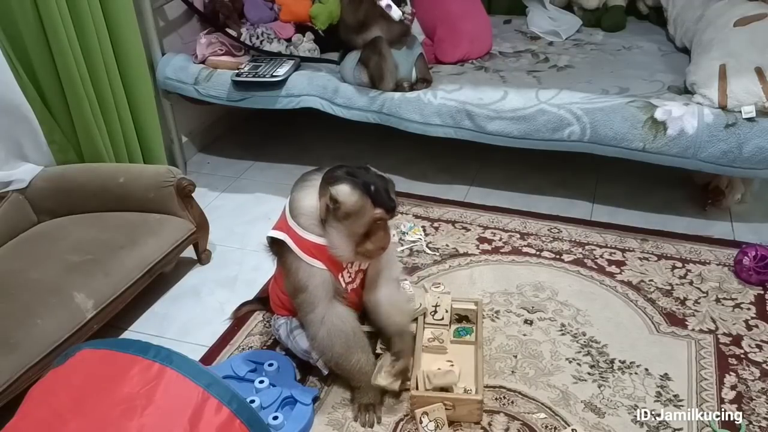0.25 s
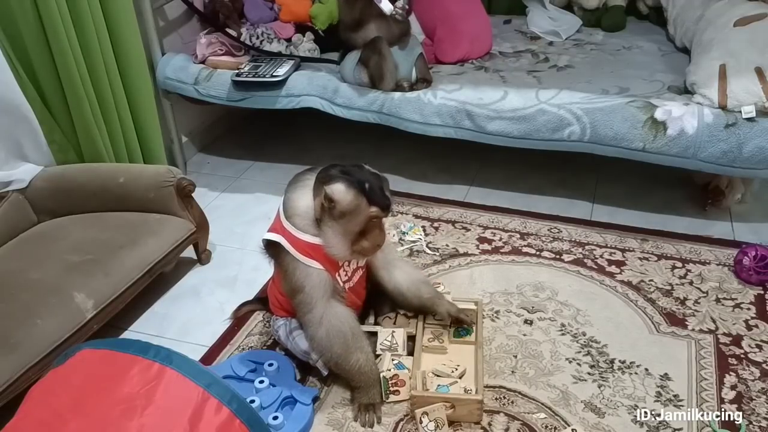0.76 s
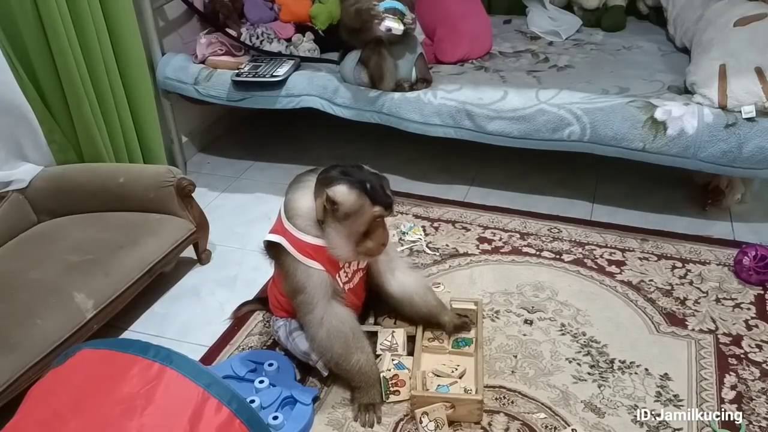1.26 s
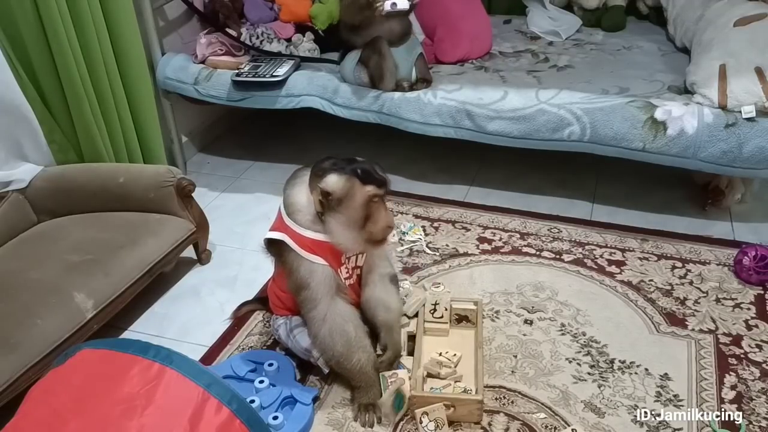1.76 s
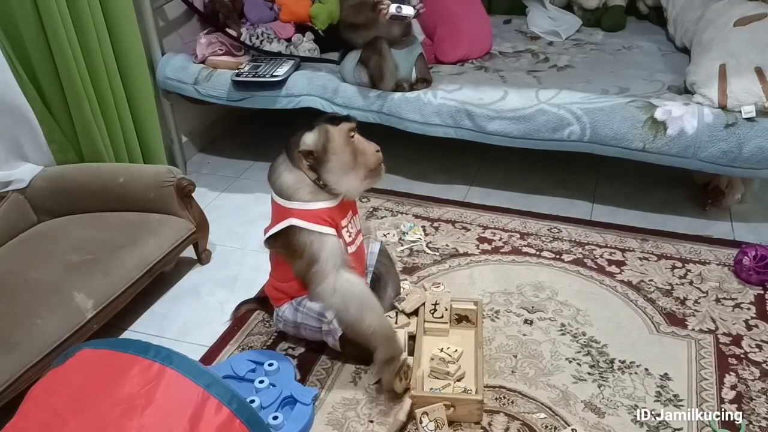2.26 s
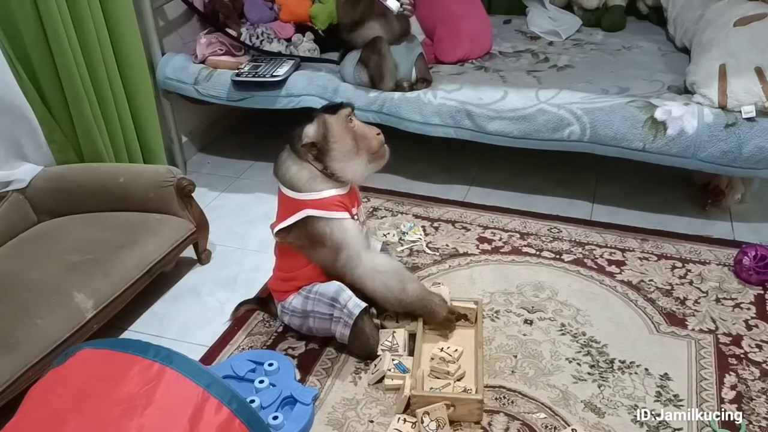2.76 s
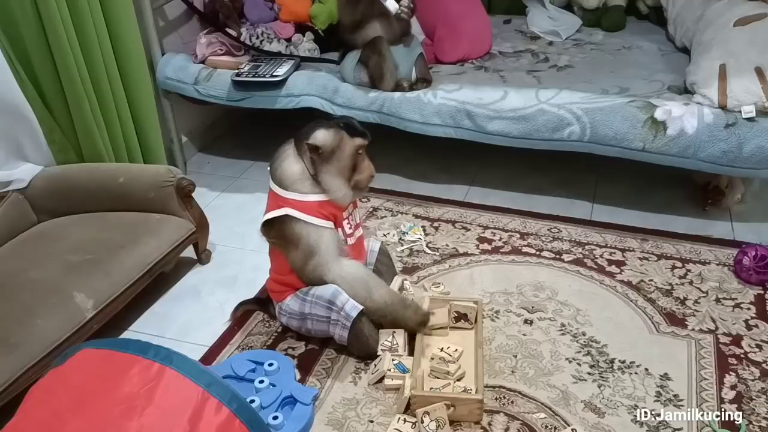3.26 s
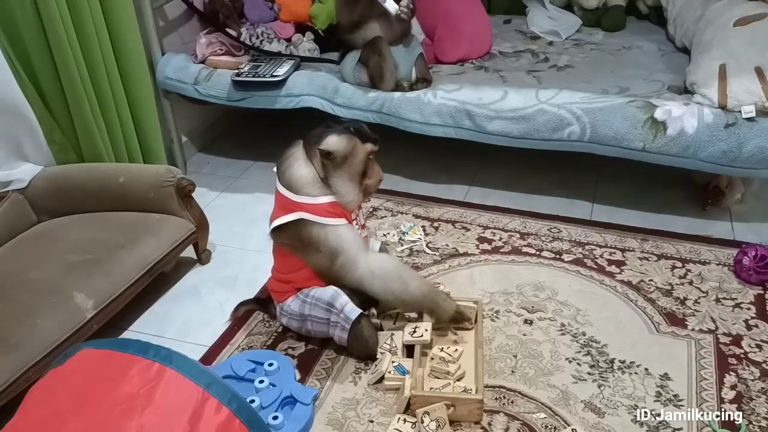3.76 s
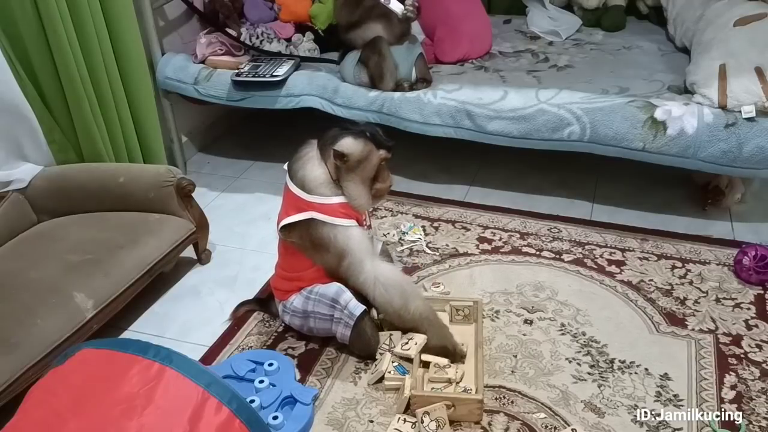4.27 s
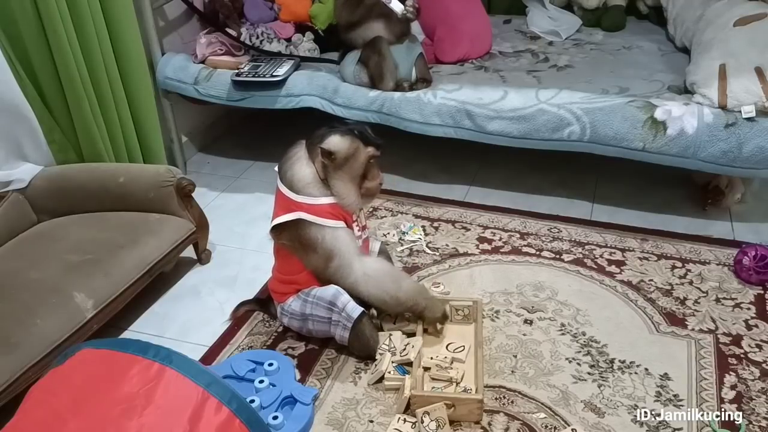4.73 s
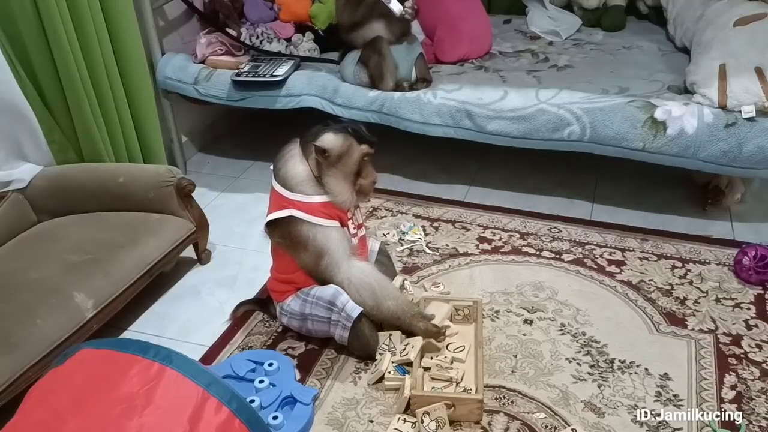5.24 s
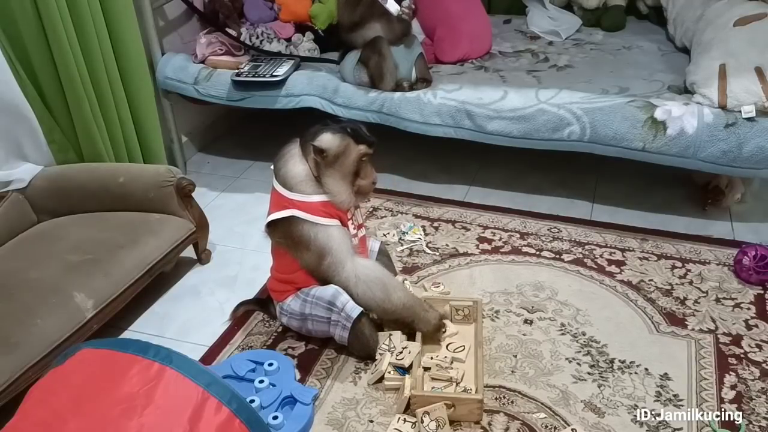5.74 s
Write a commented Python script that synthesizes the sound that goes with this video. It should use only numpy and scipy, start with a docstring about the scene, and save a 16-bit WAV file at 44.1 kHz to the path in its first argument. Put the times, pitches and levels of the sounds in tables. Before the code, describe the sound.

Wooden blocks are rummaged in a shallow box on carpet, a couple of metres from a phone microphone. A dense clatter with scraping opens, soft cloth swishes pass close on the left, then another sharp burst of clacks. Quiet isolated taps follow, before firmer knocks return past the middle and a hard cluster lands near the end. The small tiled room adds brief echoes over soft air noise and a faint low hum.

```python
"""Rummaging in a box of wooden blocks

A monkey rummages through puzzle blocks in a shallow wooden box on a carpet, a couple of metres from the microphone.
Each contact thuds the box, clacks and rings a block and ticks at its edge; filtered jerks of noise scrape in between.
Hissing cloth swishes close by on the left; echoes and a noise tail make a small tiled room, over a faint sine hum."""
import sys
import numpy as np
from scipy import signal
from scipy.fft import rfft, irfft
from scipy.io import wavfile

SR = 44100
rng = np.random.default_rng(int(sys.argv[2]) if len(sys.argv) > 2 else 0)


def store_wav(level_fs):
    """Save 16-bit WAV to argv[1]."""
    pcm = np.round(np.clip(np.atleast_2d(level_fs), -1, 1) * 32767)
    wavfile.write(sys.argv[1], SR, pcm.T.astype(np.int16))


N = 264600


def undb(db):
    """Turn dB into an amplitude factor."""
    return 10 ** (np.asarray(db) / 20)


def unit(x):
    """Scale to an energy of one."""
    return x / np.sqrt(np.sum(x ** 2, axis=-1, keepdims=True))


def fade(t, t60):
    """Exponential decay that falls by 60 dB in t60 seconds."""
    return np.exp(-np.log(1000) * t / t60)


def tint(x, points, size=2048):
    """Causal filter with the given (Hz, dB) colour, built from its cepstrum."""
    hz, db = np.transpose(points)
    f = np.maximum(np.fft.rfftfreq(size, 1 / SR), 1)
    log_gain = np.log(undb(np.interp(np.log(f), np.log(hz), db)))
    cepstrum = irfft(log_gain)
    # folding the cepstrum forward in time makes the response minimum-phase
    cepstrum[1:size // 2] *= 2
    cepstrum[size // 2 + 1:] = 0
    response = irfft(np.exp(rfft(cepstrum)))
    return signal.fftconvolve(np.atleast_2d(x), response[None], axes=-1)[:, :x.shape[-1]]


def diffuse(size, alike_hz):
    """Noise from all sides: both ears share the bass, the treble is unrelated."""
    mid, side = rfft(rng.standard_normal((2, size)))
    alike = 1 / (1 + (np.fft.rfftfreq(size, 1 / SR) / alike_hz) ** 2)
    mid, side = mid * np.sqrt(1 + alike), side * np.sqrt(1 - alike)
    return irfft(np.array([mid + side, mid - side]), size)


def strokes(rows, attack_s, release_s):
    """Each movement swells by 60 dB over the attack before its start, holds, then dies by 60 dB over its release."""
    t = np.arange(N) / SR
    start, length, db = np.transpose(rows)[:, :, None]
    early, late = np.maximum(start - t, 0), np.maximum(t - start - length, 0)
    return np.max(undb(db) * fade(early, attack_s) * fade(late, release_s), axis=0)


HUM_HZ, HUM_DB = 48.6, -62.5  # RMS level ahead of the recorder
AIR_DB = -50  # RMS level ahead of the recorder
# Colour of the air all around the microphone. Each row: frequency in Hz, relative level in dB.
AIR_COLOUR = [(20, -38), (35, -6.5), (70, -20.5), (130, -12.5), (260, -3), (420, -6), (800, -15.5),
              (1600, -20.5), (3200, -27.5), (8000, -33), (15000, -38)]


def room_tone():
    """Soft air noise and the low hum of an electric motor."""
    air = unit(tint(diffuse(N, alike_hz=700), AIR_COLOUR)) * np.sqrt(N) * undb(AIR_DB)
    hum = np.sqrt(2) * undb(HUM_DB) * np.sin(2 * np.pi * HUM_HZ * np.arange(N) / SR)
    return air + hum


def contacts(t, count, chatter_db, chatter_t60, rise_s):
    """One row per contact: a sharp push, then brief chatter as the faces settle."""
    settle = fade(t, chatter_t60) * (1 - np.exp(-t / rise_s))
    force = undb(chatter_db) * unit(rng.standard_normal((count, len(t))) * settle)
    force[:, 0] += 1
    return force


def overtones(t, count, lo_hz, hi_hz, t60, order=22):
    """Every contact gets its own random scatter of short high modes, which colours its clack and tick."""
    chance = rng.random((count, order))
    hz = lo_hz * (hi_hz / lo_hz) ** ((np.arange(order) + chance) / order)
    return sum(np.cos(2 * np.pi * f[:, None] * t) for f in hz.T) * fade(t, t60)


BOX_T60_S = 0.19
# Modes of the box floor and walls. Each row: frequency in Hz, relative level in dB.
BOX_MODES = [(302, -2.5), (405, -3.5), (428, 2), (538, -5), (598, 5), (645, 0.5), (689, -5), (805, -19.5),
             (895, -2.5), (986, -13.5), (1057, 1.5), (1190, -1)]


def box_ring(t, count, scatter_db):
    """The box's modes; each contact lands elsewhere and weights them differently."""
    hz, db = np.transpose(BOX_MODES)
    shapes = np.sin(2 * np.pi * hz[:, None] * t) * fade(t, BOX_T60_S)
    chance = rng.standard_normal((count, 2, len(BOX_MODES)))
    weights = np.sign(chance[:, 0]) * undb(db + scatter_db * chance[:, 1])
    return unit(weights @ shapes)


# Colour of a contact's dull push into the box. Each row: frequency in Hz, relative level in dB.
THUD_COLOUR = [(60, -42.5), (150, -34), (220, -15.5), (300, -11.5), (430, 5), (680, 2), (900, 0.5),
               (1200, -5), (2000, -25), (5000, -67.5)]


def box_thud(t, count):
    """Slow, low chatter of a block pressing on the box."""
    force = contacts(t, count, chatter_db=-9.5, chatter_t60=0.06, rise_s=0.0033)
    return unit(tint(force, THUD_COLOUR))


# Colour of wood meeting wood. Each row: frequency in Hz, relative level in dB.
CLACK_COLOUR = [(300, -41), (700, -7.5), (1050, 1.5), (1500, -0.5), (2200, -3), (2900, -12), (4000, -19),
                (8000, -45)]


def block_clack(t, count, high_modes):
    """Short chatter between wooden faces, with a little of the contact's high modes."""
    force = contacts(t, count, chatter_db=4, chatter_t60=0.012, rise_s=0.0011)
    return unit(tint(force + undb(-9.5) * high_modes, CLACK_COLOUR))


# Colour of a block's edge touching. Each row: frequency in Hz, relative level in dB.
TICK_COLOUR = [(1000, -42.5), (2400, -8), (3300, 5.5), (4200, 2.5), (5200, -2.5), (6900, -4), (8700, -16.5),
               (11800, -20), (16000, -29)]
# Colour of the brighter crack at that edge. Each row: frequency in Hz, relative level in dB.
CRACK_COLOUR = [(3000, -22), (5500, -3.5), (6900, 4), (8700, -1), (10300, -6.5), (11800, -4), (13500, -21),
                (16000, -19.5)]


def edge_tick(t, count, high_modes, tick_db):
    """An edge's quick chatter; a harder blow is a shorter contact, so its bright crack grows faster than its tick."""
    edge = contacts(t, count, chatter_db=13.5, chatter_t60=0.028, rise_s=0.00058) + undb(2.5) * high_modes
    crack_db = tick_db + 0.21 * np.clip(tick_db, -7, 28) - 29.5
    tick = undb(tick_db - 15.5) * unit(tint(edge, TICK_COLOUR))
    crack = undb(crack_db) * unit(tint(edge, CRACK_COLOUR))
    return tick + crack


RING_T60_S = .042  # for a block that rings at 1 kHz


def block_ring(t, hz, split, partner_db, twist, twist_db):
    """A nearly square block rings with a close pair of bending modes and a twisting mode near twist times the first."""
    chance = rng.uniform(-1.1, 1, (len(hz), 3))
    partner_hz = hz * (1 + split * chance[:, :1])
    twist_hz = hz * twist * (1 + 0.1 * chance[:, 1:2])
    bending = np.sin(2 * np.pi * hz * t)
    partner = undb(partner_db) * np.sin(2 * np.pi * partner_hz * t + np.pi * chance[:, 2:])
    twisting = undb(twist_db) * np.sin(2 * np.pi * twist_hz * t)
    # wood damps high notes sooner than low ones
    t60 = RING_T60_S * np.sqrt(1000 / hz)
    return unit((bending + partner + twisting) * fade(t, t60) * (1 - np.exp(-t * hz)))


# dB of clack per dB of strength: a light touch sounds mostly the block, a heavy one the box as well
CLACK_GROWTH = 0.76
# Knocks that stand out from the box; a hard one meets an edge, a soft one lands flat.
# Each row: start in seconds, relative strength in dB, hardness in dB, block ring in Hz, relative ring level in dB.
STANDOUT_KNOCKS = [(.0437, -6, 6, 3150, -5), (.0634, 5.5, -1, 2140, -15), (.0971, 9, -2, 2105, 8.5),
                   (.166, 9, -3, 2240, -21), (.1825, 7.5, -5, 2200, 4.5), (.2785, 17, -3.5, 930, 14),
                   (.3159, 22.5, -1, 1019, 18), (.3321, 19, 2, 2120, 16), (.3769, 2, -12, 3070, 11.5),
                   (.4274, 12.5, -5, 1120, 4), (.4731, 8, 22, 3880, -13), (.5762, -12, -12.5, 940, -8),
                   (.7909, 5, 4, 2080, 5.5), (.8237, 10, 9.5, 1445, 11.5), (1.3361, -1.5, 2.5, 1070, 1),
                   (1.485, 9, 1.5, 1130, 5), (1.5094, 9.5, -2, 3070, -10), (1.5222, 19, -1, 3136, 15),
                   (1.5338, 10.5, -2.5, 2980, -15), (1.5872, 15, -1.5, 1170, 11),
                   (1.6416, 15, 13, 3980, 22), (1.6515, 18, 6, 3970, 13.5), (1.6641, 20, 1, 3830, 0),
                   (1.7434, 10, -3, 4130, -6), (1.8927, 4, 2, 880, 0), (1.9403, -26.5, 1, 4100, -12.5),
                   (2.229, -14, 18.5, 3380, -13.5), (2.2468, -7, 5.5, 1000, -2.5), (2.7108, -4, 4, 1924, 1),
                   (2.8855, -9.5, 4.5, 4030, -16), (2.95, -10.5, -1, 1420, -1),
                   (2.9684, -10, 4.5, 2100, -11.5), (3.0681, -11.5, -24.5, 850, 6.5),
                   (3.1534, -2, 1, 4170, -7), (3.2555, 3, 9.5, 3185, 3.5), (3.3221, -6.5, 7, 3570, -5),
                   (3.4277, -9, 0, 1045, -10.5), (3.5528, -16, -9.5, 2070, -11.5),
                   (3.985, -24.5, -7, 1360, -15.5), (4.0587, 0, 4, 1950, -1),
                   (4.115, -15.5, -20.5, 1110, -11), (4.1326, 5, -10.5, 1163, 6),
                   (4.1527, 16, 9.5, 1214, 4), (4.1744, 0.5, -17.5, 837, 9), (4.2745, 9.5, -3.5, 1200, 6),
                   (4.2907, 3, 0.5, 1090, -5), (4.4331, 13.5, -3, 1140, 7), (4.5306, 18.5, -3, 1178, 13),
                   (4.7349, -4.5, 15.5, 1112, -6), (4.7617, 11, 1, 1520, -18), (5.2322, 19.5, -7, 956, -1),
                   (5.2486, 20, 6.5, 1480, 13), (5.256, 26, 1, 3430, -9), (5.2788, 18, 4.5, 1130, 0),
                   (5.8614, 6.5, -6, 1466, 7.5)]


def knocks(more_hits, size=10000, short_size=3500, count=4):
    """Every contact is thud, clack, tick and ring together; contacts take turns on one track per part of the box."""
    hits = np.vstack([STANDOUT_KNOCKS, *more_hits])
    t_box, t = np.arange(size) / SR, np.arange(short_size) / SR
    start, strength_db, hardness_db, ring_hz, ring_db = np.transpose(hits)[:, :, None]
    # hardness trades the thud for the tick
    thud_db, tick_db = strength_db - hardness_db, strength_db + hardness_db
    clack_db = CLACK_GROWTH * strength_db
    n = len(hits)
    high_modes = unit(overtones(t, n, lo_hz=1119, hi_hz=13840, t60=0.051))
    thud = undb(thud_db - 7.5) * box_thud(t, n)
    clack = undb(clack_db - 3.5) * block_clack(t, n, high_modes)
    tick = edge_tick(t, n, high_modes, tick_db)
    ring = block_ring(t, ring_hz, split=0.099, partner_db=-4.5, twist=1.0, twist_db=-8.5)
    sounds = undb(thud_db - 10.5) * box_ring(t_box, n, scatter_db=3.5)
    sounds[:, :short_size] += thud + clack + tick + undb(ring_db - 3.5) * ring
    out = np.zeros((count, N + size))
    for k, i in enumerate((start[:, 0] * SR).astype(int)):
        out[k % count, i:i + size] += sounds[k]
    return out[:, :N]


JOSTLE_GAP_S, JOSTLE_SCATTER_DB, JOSTLE_RING_DB = .022, 2.5, -3  # ring is relative to the strength
# Rings of the largest and the smallest block, in Hz.
BLOCK_RANGE_HZ = 900, 3930


def jostle(start, length, db):
    """Unevenly spaced contacts of a tumbling pile; large blocks are the most common."""
    count = max(int(length / JOSTLE_GAP_S), 1)
    place, smallness = rng.random((count, 2)).T
    strength, hardness, ring = JOSTLE_SCATTER_DB * rng.standard_normal((count, 3)).T
    largest_hz, smallest_hz = BLOCK_RANGE_HZ
    hz = largest_hz * (smallest_hz / largest_hz) ** (smallness ** 2)
    times = start + (np.arange(count) + place) * JOSTLE_GAP_S
    return np.transpose([times, db + strength, hardness, hz, db + JOSTLE_RING_DB + ring])


# The pile in the box gives way. Each row: start in seconds, length in seconds, relative strength in dB.
PILE_TUMBLES = [(0.187, .27, 9), (1.55, .15, 5), (1.763, .06, 5.5), (4.193, .11, -5.5)]


def tumbles():
    """The pile's blocks jostle at random each time it gives way."""
    return np.vstack([jostle(*tumble) for tumble in PILE_TUMBLES])


def scrape(effort, colour, slips_per_s, spread_db):
    """Sliding wood catches and slips in dense, uneven little jerks."""
    happens = rng.random(N) < slips_per_s / SR
    strength = undb(spread_db * rng.exponential(size=N).clip(0, 4))
    slips = happens * rng.choice([-1, 1], N) * strength
    return unit(tint(slips, colour)[0]) * np.sqrt(N) * effort


# A block is pushed over wood. Each row: start in seconds, length in seconds, relative level in dB.
BLOCK_PUSHES = [(.3, 0.073, -27), (1.53, 0.066, -42), (3.74, 0.032, -53), (4.61, 0.021, -32),
                (4.74, .04, -40)]
# Colour of wood on wood. Each row: frequency in Hz, relative level in dB.
BLOCK_PUSH_COLOUR = [(150, -26.5), (400, 0.5), (1000, -1.5), (2200, -5), (4000, -8), (7000, -14),
                     (10000, -20), (16000, -25)]


def pushed_blocks():
    """Catching and slipping of a block pushed over wood."""
    effort = strokes(BLOCK_PUSHES, attack_s=0.34, release_s=0.17)
    return scrape(effort, BLOCK_PUSH_COLOUR, slips_per_s=1100, spread_db=4.5)


# The whole box is shoved over the carpet. Each row: start in seconds, length in seconds, relative level in dB.
BOX_SHOVES = [(.3, 0.17, -28.5), (1.19, 0.011, -32.5), (1.525, .04, -24.5), (1.745, 0.018, -23),
              (1.84, 0.061, -33.5), (4.32, 0.036, -37)]
# Colour of the box's shuddering floor. Each row: frequency in Hz, relative level in dB.
BOX_SHOVE_COLOUR = [(100, -24), (170, -12.5), (230, -5), (300, 1), (420, 1), (700, -2.5), (1100, -8),
                    (2000, -20.5), (5000, -58)]


def dragged_box():
    """The box's floor shudders in low jerks, sparser and more uneven than a block's."""
    effort = strokes(BOX_SHOVES, attack_s=0.18, release_s=.28)
    return scrape(effort, BOX_SHOVE_COLOUR, slips_per_s=840, spread_db=7)


def left_hiss(effort, colour, spread_db, lag_count=9):
    """Smooth hiss, as of sliding fibres, that is louder in the left ear and reaches it first."""
    source = rng.standard_normal(N)
    both_ears = np.array([source, np.roll(source, lag_count)])
    hiss = both_ears + undb(spread_db) * rng.standard_normal((2, N))
    return unit(tint(hiss, colour)) * np.sqrt(N) * effort * undb([[-1.5], [-3.2]])


# Cloth swishes near the microphone. Each row: start in seconds, length in seconds, relative level in dB.
CLOTH_SWISHES = [(.67, 0.38, -28), (1.31, .2, -28.5)]
# Colour of the swish. Each row: frequency in Hz, relative level in dB.
CLOTH_SWISH_COLOUR = [(300, -27.5), (1200, -10.5), (2400, -8.5), (3200, -2.5), (4200, 1.5), (5000, -5),
                      (6000, -8.5), (8600, -14), (9600, -14.5), (11700, -10), (13200, -11.5), (15400, -19)]


def cloth_swish():
    """Full swishes of cloth that swell and die slowly."""
    effort = strokes(CLOTH_SWISHES, attack_s=0.27, release_s=0.56)
    return left_hiss(effort, CLOTH_SWISH_COLOUR, spread_db=1.5)


# Thin, bright hisses: faint cloth brushing near the microphone, and the bright top of the scrape at 4.61 s.
# Each row: start in seconds, length in seconds, relative level in dB.
THIN_HISSES = [(2.05, 0.83, -64), (4.61, 0.044, -40), (5.06, 0.23, -45)]
# Colour of these hisses. Each row: frequency in Hz, relative level in dB.
THIN_HISS_COLOUR = [(500, -11.5), (2300, -8.5), (3500, -9), (4000, -4.5), (5500, -10.5), (8000, -12),
                    (8600, -18), (10500, -5), (11700, -1), (12700, -7.5), (15400, -13)]


def thin_hiss():
    """Thin, bright noise for faintly brushing cloth and for the top of one scrape."""
    effort = strokes(THIN_HISSES, attack_s=0.29, release_s=.12)
    return left_hiss(effort, THIN_HISS_COLOUR, spread_db=5.0)


TAP_HZ, TAP_STRENGTH_DB, TAP_HARDNESS_DB = 1030, -15, -8  # strength is relative to the ring
TAP_DETUNE = .02  # spread of the pitch from tap to tap, as a share
# One loose block rocks in the box, so softly that little but its ring is heard.
# Each row: start in seconds, relative ring level in dB.
ROCKING_TAPS = [(2.3046, -2), (2.416, -13), (2.5814, -3), (2.6427, -2.5), (2.6582, -2), (2.759, -3.5),
                (2.8377, -8.5), (3.3581, -2.5), (3.389, -6.5), (5.075, -14), (5.66, -3), (5.796, -19),
                (5.9271, -0.5)]


def taps():
    """The rocking block's soft contacts, the pitch shifting a little with the corner it lands on."""
    pitches = TAP_HZ * (1 + TAP_DETUNE * rng.standard_normal(len(ROCKING_TAPS)))
    return [(s, db + TAP_STRENGTH_DB, TAP_HARDNESS_DB, hz, db) for (s, db), hz in zip(ROCKING_TAPS, pitches)]


ROOM_T60_S = 0.25  # below about 2500 Hz


def room(x, wet_db, treble_t60, build_s, size=24000):
    """Direct sound, a few early echoes off floor and furniture, then a tail with a decay each for bass and treble."""
    t = np.arange(size) / SR
    noise = diffuse(size, alike_hz=417)
    low = signal.sosfiltfilt(signal.butter(2, 2500, fs=SR, output="sos"), noise)
    tail = low * fade(t, ROOM_T60_S) + (noise - low) * fade(t, treble_t60)
    response = undb(wet_db) * unit(tail * (1 - np.exp(-t / build_s)))
    response[:, 0] += undb(-2.5)  # direct sound
    for lag_s, echo_db in [(.0031, -9), (.0118, -12.5), (.0215, -18.5)]:
        # each echo has its own direction, mostly reaching one ear sooner
        skew = rng.integers(-12, 13)
        response[[0, 1], [int(lag_s * SR) + skew, int(lag_s * SR) - skew]] += undb(echo_db)
    return signal.fftconvolve(x[None], response, axes=-1)[:, :N]


LOWEST_HZ = 190.5


def scene():
    """Knocking and sliding wood in the room, with the close hisses and the room tone."""
    knocking = knocks([tumbles(), taps()])
    sliding = pushed_blocks() + dragged_box()
    # a small open box radiates almost no bass
    highpass = signal.butter(3, LOWEST_HZ, "highpass", fs=SR, output="sos")
    wood = signal.sosfilt(highpass, np.vstack([knocking, sliding]))
    # each part of the box, and the sliding, has its own paths through the room
    heard = sum(room(part, wet_db=1.8, treble_t60=0.25, build_s=0.0056) for part in wood)
    return heard + cloth_swish() + thin_hiss() + room_tone()


TOP_HZ = 15700


def record(dry):
    """The phone's microphone rounds the highest peaks and cuts the top."""
    rounded = np.tanh(0.41 * dry) / 0.65
    return signal.sosfilt(signal.ellip(10, .2, 80, TOP_HZ, fs=SR, output="sos"), rounded)


dry = scene()
out = record(dry)
store_wav(out)
```